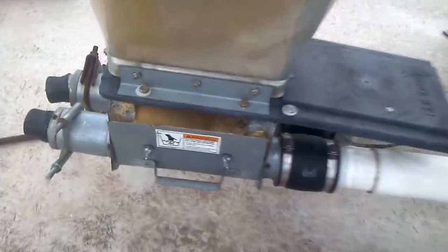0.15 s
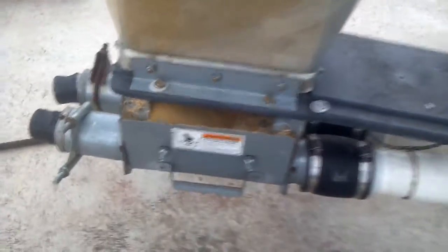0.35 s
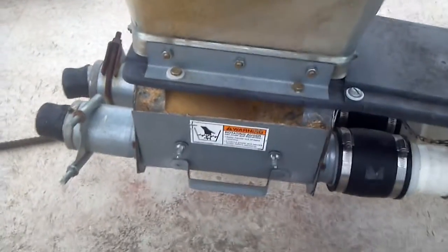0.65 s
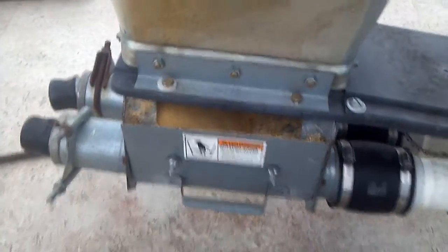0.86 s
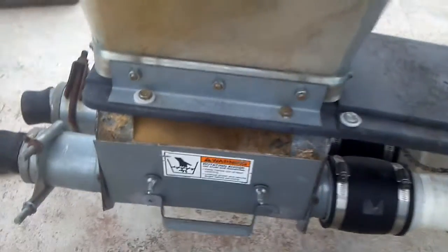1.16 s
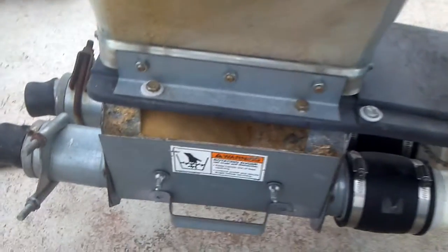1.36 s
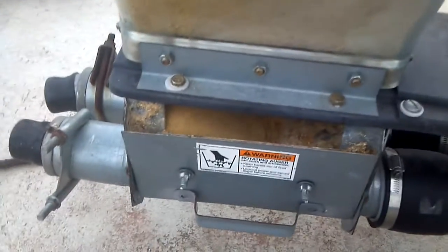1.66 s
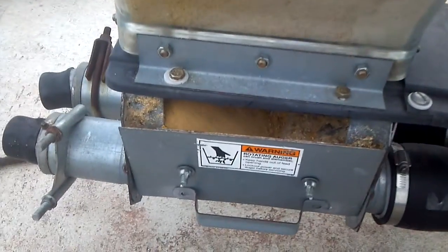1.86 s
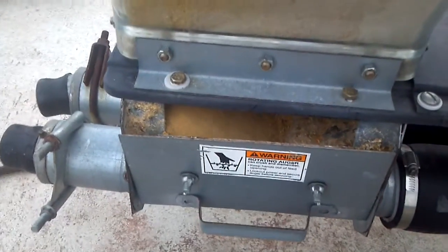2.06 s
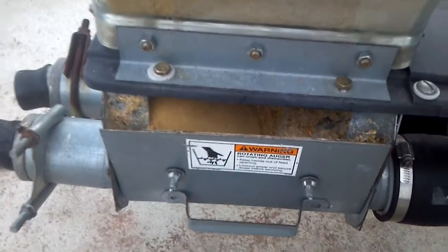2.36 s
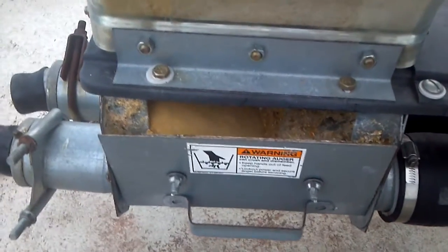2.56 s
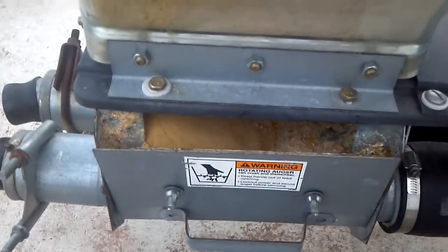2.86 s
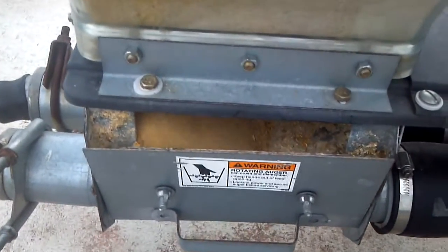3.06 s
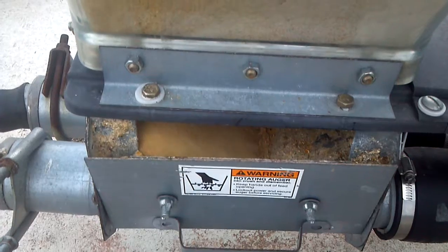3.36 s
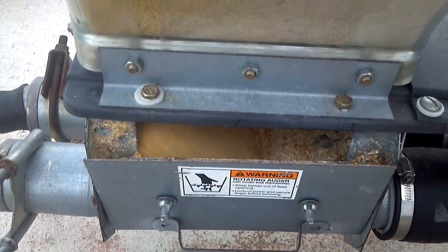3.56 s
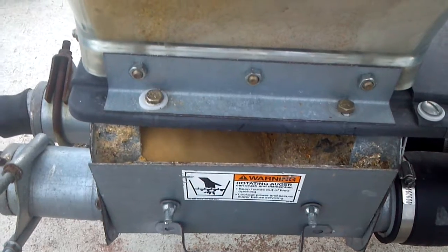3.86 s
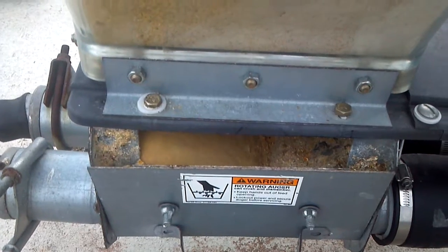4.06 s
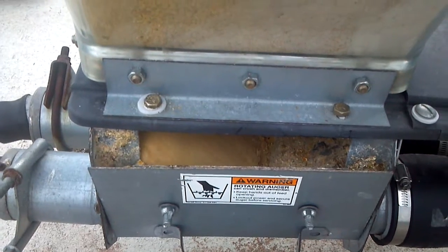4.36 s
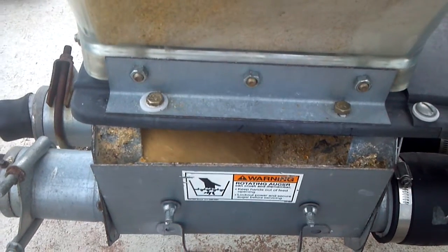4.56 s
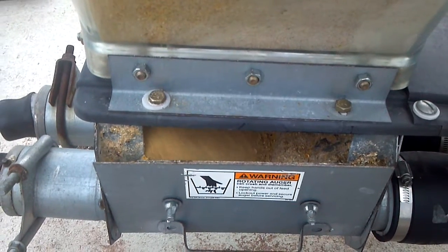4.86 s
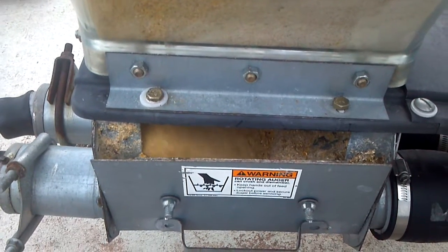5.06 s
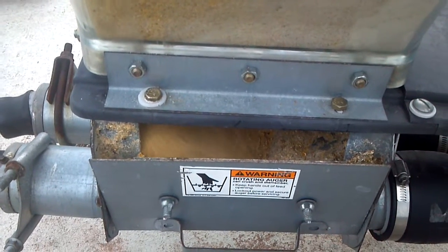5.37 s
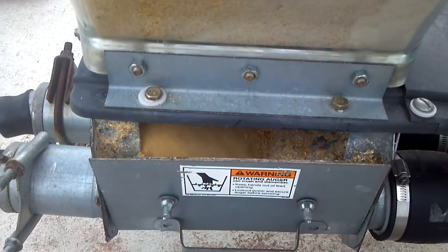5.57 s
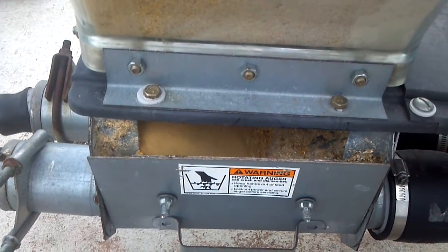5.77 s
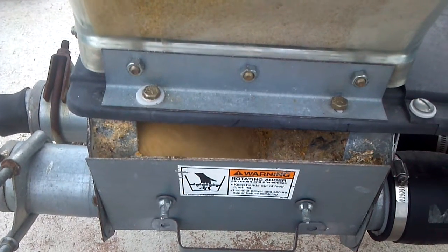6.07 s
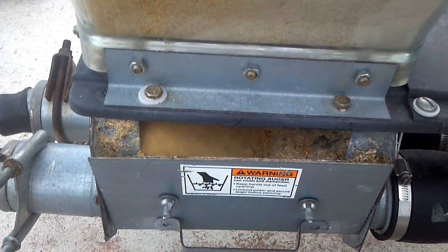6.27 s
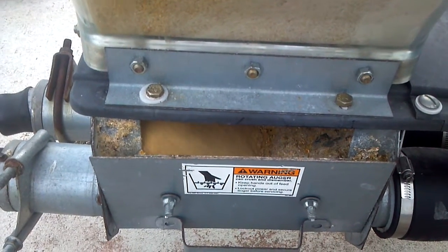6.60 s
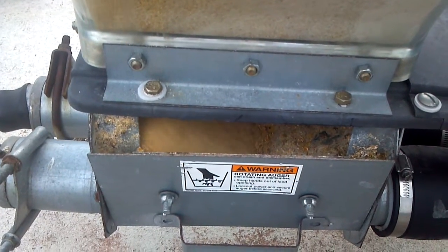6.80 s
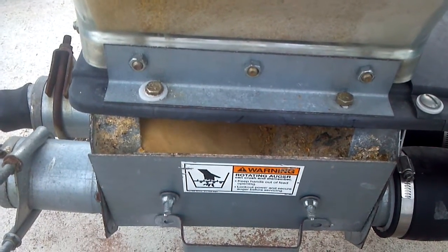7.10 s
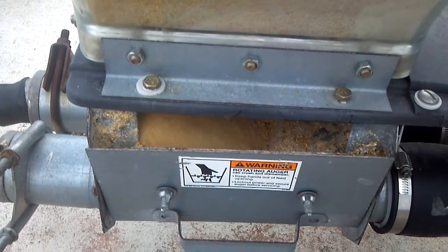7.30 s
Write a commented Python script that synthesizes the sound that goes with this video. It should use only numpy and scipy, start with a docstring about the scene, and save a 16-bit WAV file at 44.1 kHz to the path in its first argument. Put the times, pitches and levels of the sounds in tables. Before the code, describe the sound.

Dry feed hisses and crackles through a steel boot while an auger scrapes round quickly, with hard ticks and low irregular air thumps up close.

```python
"""Feed hisses and crackles through a boot under a hopper, heard close in a farm building.
A flexible auger turns about six times a second: its coil scrapes the tube, which answers with a hollow whirr.
Hard bits tick and rattle on the steel, over the outlet pipe's rattle and the tube's low shudder.
Moving air thumps irregularly, mostly on the left of two microphone ports.
Grains and air are shaped noise; eddies and the ring of the steel are decaying sinusoids."""
import sys
import numpy as np
from scipy import signal
from scipy.fft import rfft, irfft
from scipy.io import wavfile
from scipy.ndimage import uniform_filter1d, minimum_filter1d

SR = 44100
rng = np.random.default_rng(int(sys.argv[2]) if len(sys.argv) > 2 else 0)


def master_out(mix):
    """Clip the mix to full scale and print it as 16-bit PCM to the path in sys.argv[1]."""
    frames = np.transpose(np.atleast_2d(mix))
    ceiling = np.clip(frames, -1, 1)
    pcm = np.round(ceiling * 32767).astype(np.int16)
    wavfile.write(sys.argv[1], SR, pcm)


N = 328104
TIME = np.arange(N) / SR  # s
BINS = np.fft.rfftfreq(N, 1 / SR)  # Hz

# All levels are relative, ahead of the gains in the functions and in record().
# Feed sliding through the boot, which drives hiss, grinding and rasp: [t/s, level/dB]
FEED_FLOW = [(0.0, -27.5), (0.66, -27), (0.98, -27.0), (1.54, -24.5), (1.7, -29), (2.3, -28.5),
             (2.4, -26.5), (2.64, -31.5), (2.8, -29.5), (3.6, -28), (4.3, -28.5), (4.72, -27),
             (5.06, -28.5), (6.32, -28), (6.36, -29.5), (6.72, -31), (6.78, -29), (7.42, -29)]
# Largest spurts of feed on top of the steady flow: [t/s, level/dB]
FEED_SPURTS = [(.132, -26.5), (.508, -27), (.624, -25.5), (1.943, -31), (3.614, -31), (3.685, -34),
               (4.23, -29), (4.99, -34), (5.517, -26.5), (5.804, -34), (6.16, -27.5), (6.235, -29),
               (6.275, -27)]
# Smaller spurts come at random, at a level against the flow
SMALL_SPURTS_PER_S, SMALL_SPURT_DB = 2.3, -1
# Centre pitches of large, middling and fine grains: [f/Hz]
GRAIN_PITCHES = [3300, 7100, 11500]
# Centre pitches of coarse bits ground along the tube: [f/Hz]
COARSE_PITCHES = [750, 1710, 3920]
# Spectrum of grains sliding over steel: [f/Hz, density/dB per Hz]
HISS_SPECTRUM = [(400, -64), (1300, -5.5), (2000, -30.5), (3400, 1), (4100, -3), (4800, -1), (7000, 1),
                 (9200, 1.5), (10700, -1.5), (12500, -6.5), (14000, -9.5), (15600, -12.5)]
# Spectrum of coarse bits along the tube: [f/Hz, density/dB per Hz]
GRINDING_SPECTRUM = [(60, -19), (200, -17), (420, -5), (900, 1), (1250, -4), (1550, 2), (1800, 5),
                     (2100, 7), (3400, -3.5), (4500, -33), (8000, -18.5)]
GRIND_DB = -9.5  # against the hiss

# Rattle of the outlet pipe: [t/s, level/dB]
PIPE_LEVEL = [(0, -39), (1.2, -42.5), (2.2, -52.5), (7.44, -69)]
# Resonances of the outlet pipe: [f/Hz, half-width/Hz, level/dB]
PIPE_RESONANCES = [(600, 250, -3), (1040, 78, 3.5), (1360, 41, 2.5), (1645, 74, 4)]

# Shudder of the tube, shaken by the coil: [f/Hz, density/dB per Hz]
RUMBLE_SPECTRUM = [(30, -28), (65, -11), (90, -1.5), (130, -0.5), (180, -6), (250, -9.5), (350, -13),
                   (480, -18), (700, -26), (2000, -70)]
RUMBLE_DB = -37

# The coil meets the wall once a turn, a little early or late
TURNS_PER_S, FIRST_TURN_S, TURN_JITTER_S = 6.15, 0.1082, 0.0052
# The coil catches on a lump: [t/s, rasp level/dB, level of the tube's ring/dB]
LUMP_CATCHES = [(.105, -24, -36), (.255, -30, -35), (.434, -21, -30), (.761, -29, -38), (.923, -30.5, -51),
                (1.252, -34, -48), (1.418, -39, -26.5), (1.583, -36, -31), (1.905, -33, -43),
                (2.073, -27.5, -33.5), (2.245, -44, -32), (2.395, -38, -43), (3.024, -42, -30),
                (3.516, -25.5, -34), (3.839, -29, -32), (4.331, -30, -30.5), (4.495, -28, -35),
                (4.987, -27.5, -41), (5.311, -29, -50), (5.475, -35, -35), (5.636, -32, -37),
                (5.805, -28.5, -53), (5.975, -40, -30.5), (6.127, -27, -45), (6.947, -28, -36)]
# Resonances of the tube: [f/Hz, half-width/Hz, level/dB]
TUBE_RESONANCES = [(610, 260, -4), (730, 163, -2), (745, 84, -2), (828, 84, 1.5), (1010, 40, -9)]
# Level of the whirr with the microphone's nearness to the boot: [t/s, level/dB]
WHIRR_NEARNESS = [(0, 1), (2.7, 0.4), (4, 2.5), (7.44, 1.7)]
WHIRR_DB, WHIRR_SPREAD_DB = -40, 3
# The rubbing point shifts, so each resonance swells and sinks by itself
MODE_SWAY_DB, MODE_SWAY_HZ = 2.5, 12

# Strength of the draught at the microphone: [t/s, level/dB]
DRAUGHT_LEVEL = [(0.0, -33), (0.2, -42), (0.47, -30), (0.63, -32), (0.79, -45), (1.2, -28.5), (1.42, -39),
                 (1.53, -29), (2.02, -32), (2.2, -35.5), (2.52, -21), (2.62, -28), (2.98, -41), (3.2, -43),
                 (3.48, -48), (3.68, -30.5), (4.05, -39), (4.3, -31.5), (4.55, -36.5), (4.75, -24.5),
                 (5.17, -42), (5.3, -25), (5.5, -32), (5.62, -48), (6.03, -40), (6.14, -26.5), (6.27, -41),
                 (6.4, -48), (6.58, -55), (6.66, -36), (6.82, -40), (6.92, -32), (7.2, -47), (7.44, -37.5)]
# Strongest eddies hitting the microphone: [t/s, level/dB, f/Hz, decay constant/s]
STRONG_EDDIES = [(.4224, -15, 116, 0.008), (.519, -23, 120, 0.0047), (.6258, -11, 185, 0.0033),
                 (.9784, -17, 125, 0.013), (1.121, -15, 111, 0.0047), (1.1968, -19.5, 199, 0.01),
                 (1.2158, -16, 135, 0.0046), (1.281, -19, 143, 0.0053), (1.5052, -10.5, 135, 0.0031),
                 (1.5322, -17, 112, 0.013), (1.5963, -9.5, 138, 0.007), (1.6555, 0, 201, 0.0018),
                 (1.7538, -8.5, 127, 0.0068), (1.907, -22, 100, 0.0046), (2.0165, -8.5, 151, 0.0082),
                 (2.3163, -13, 107, .012), (2.4127, -23, 157, 0.017), (2.4553, -16, 177, .015),
                 (2.4842, -12, 194, .005), (2.5255, -6.5, 115, 0.0055), (2.5574, -6.5, 213, 0.0066),
                 (2.6462, -6.5, 213, 0.003), (2.689, -13.5, 251, 0.0061), (2.6983, -11.5, 182, 0.0067),
                 (2.8577, -10.5, 119, .009), (2.98, -17.5, 184, 0.0063), (3.7073, -13, 221, 0.0022),
                 (4.2771, -16.5, 141, 0.012), (4.331, -18, 124, 0.005), (4.556, -19, 116, 0.0088),
                 (4.6605, -4, 220, 0.00075), (4.6806, -12.5, 168, .009), (4.7401, -16, 159, .012),
                 (4.764, -9, 170, 0.0029), (4.7843, -6, 148, 0.012), (4.8355, -10, 135, 0.0037),
                 (4.871, -15, 155, .005), (4.921, -23, 113, .007), (5.0284, -16, 115, .012),
                 (5.0628, -14.5, 114, .012), (5.1727, -17, 147, 0.0039), (5.2476, -14.5, 134, 0.011),
                 (5.2717, -8.5, 142, 0.0052), (5.2917, -5.5, 173, 0.0046), (5.4421, -13.5, 110, 0.026),
                 (5.4894, -12.5, 106, 0.0055), (6.1101, -21, 149, 0.0047), (6.1372, -20.5, 103, 0.0073),
                 (6.2455, -13.5, 98, 0.0081), (6.672, -29, 113, .007), (6.731, -21, 113, 0.0055),
                 (6.872, -20, 129, 0.0084), (6.91, -15, 119, 0.0071), (6.957, -23, 100, .01),
                 (7.101, -19, 100, .008)]
# Spectrum of the turbulent air: [f/Hz, density/dB per Hz]
BUFFET_SPECTRUM = [(20, -39), (45, -17), (65, -9.5), (90, -0.5), (120, 0), (165, -3), (220, -8.5),
                   (320, -19.5), (450, -27), (900, -101), (2000, -82)]
# The draught swells and sinks by at most this much, up to about this often a second
LUMP_RANGE_DB, LUMP_HZ = 6, 22.3
# Smaller eddies come at random, at a level against the draught
SMALL_EDDIES_PER_S, SMALL_EDDY_DB, SMALL_EDDY_HZ, SMALL_EDDY_FALL_S = 6.8, 2, 175, 0.009

# Hardest bits striking the steel: [t/s, level/dB, bright against dull/dB, rattling share/0-1]
HARD_TICKS = [(0.084, -20, 7, .02), (.129, -17, 11, .2), (0.2476, -16, 10, 0), (.4325, -23, 7, 0.7),
              (0.8477, -17.5, 4, 0.7), (0.914, -15, 4, 0.7), (0.92, -22, 6, .6), (1.018, -17, 17, .2),
              (1.478, -24, 8, .3), (1.497, -16, 14, .2), (1.706, -14.5, 16, 0.5), (1.9426, -17, 15, 0.2),
              (2.2015, -15, 16, 0), (2.2897, -19, 0, 0.15), (2.3512, -17.5, 9, 0.3),
              (2.4867, -12.5, -1, 0.03), (2.7786, -20, 2, 0.3), (3.066, -20, 10, .1), (3.1926, -24, 8, .1),
              (3.211, -19, 9, 0.5), (3.6085, -16.5, 7, 0.7), (3.673, -16.5, 11, .5),
              (3.8408, -12.5, 4, 0.4), (3.9027, -18, -10, 0.4), (4.152, -16.5, 5, .7), (4.548, -23, 8, .1),
              (4.637, -17.5, 6, 0.7), (4.803, -18, 8, .5), (4.8963, -10, -1.5, 0.04), (5.5493, -20, 6, .6),
              (5.7136, -18, 4, 0.2), (5.941, -21, 5, 0), (5.982, -20.5, 6, 0.5), (6.0172, -14, 20, 0.4),
              (6.3147, -11, -10, 0.4), (6.347, -18.5, 0, .1), (6.77, -20.5, 9, 0), (6.799, -16, 4, 0.1),
              (6.805, -26, 10, .1), (6.8285, -21, 10, 0.1), (6.9327, -15, 2, 0.02), (7, -24, 10, 0),
              (7.105, -15.5, 10, 0.3), (7.1116, -18.5, 9, 0), (7.205, -16.5, 16, 0), (7.247, -17.5, 14, .7)]
# Dull part of a tick: [f/Hz, density/dB per Hz]
DULL_SPECTRUM = [(500, -24), (1300, -14), (2200, -3), (3000, 3), (4100, -2), (4700, 9), (5400, 5.5),
                 (6800, 2), (8200, 3), (10000, -1.5), (12000, -8), (16000, -17)]
# Bright part of a tick: [f/Hz, density/dB per Hz]
BRIGHT_SPECTRUM = [(1000, -13.5), (4500, -9), (7000, -4.5), (9700, -4.5), (12000, -9.5), (16000, -16)]
# Lighter bits strike at random, at a level against the flow
SMALL_TICKS_PER_S, SMALL_TICK_DB, SMALL_TICK_SPREAD_DB = 13, 3.6, 2.2
SMALL_TICK_BRIGHT_DB, SMALL_TICK_RATTLE = 6, .2
SNAP_S, RATTLE_S = .0008, .0045  # decay constants: snap in amplitude, rattle in power
# Ring of the boot under heavy bits: [f/Hz, level/dB, t60/s]
STEEL_MODES = [(3400, -4, 0.026), (4770, -3, 0.019), (9670, -7.5, .045)]

# Spectrum of the coil's scrape: [f/Hz, density/dB per Hz]
RASP_SPECTRUM = [(400, -26), (900, 11), (1400, 1), (1900, 13), (3500, 8), (6000, 6), (10000, -0.5),
                 (16000, -36)]
RASP_DB, RASP_SPREAD_DB = -3.5, 1.5  # against the flow

# Shaded right port against the left, for sound from the boot: [f/Hz, level/dB]
PORT_SHADE = [(500, 0), (2000, -2), (3500, -5), (4300, -4), (7000, -7.5), (10000, -7), (15000, -4.5)]
# Colour of the left channel against the right: [f/Hz, level/dB]
CHANNEL_BALANCE = [(250, -3.4), (500, -4.5), (800, -6), (1380, -2), (2000, -2.5), (2750, 0), (3400, -3),
                   (4150, -.5), (5500, -1), (6300, -2.5), (8300, -2.8), (11000, -1.5), (13800, -.3)]
PORT_LAG = 16  # samples
EDGE_HZ = 15800


def gain_of(db):
    """Decibels to amplitude."""
    return 10 ** (np.asarray(db) / 20)


def evened(x):
    """Scales to an rms of one."""
    return x / np.sqrt(np.mean(x ** 2) + 1e-20)


def level_at(rows, s):
    """Level in dB of a (t/s, level/dB) curve at the times s."""
    return np.interp(s, *np.transpose(rows))


def curve(rows):
    """Gain over time from (t/s, level/dB) rows."""
    return gain_of(level_at(rows, TIME))


def spectrum(points):
    """Gain over frequency from (f/Hz, level/dB) points, joined on a logarithmic pitch scale."""
    hz, db = np.transpose(points)
    return gain_of(np.interp(np.log(BINS + 1), np.log(hz), db))


def shaped(x, gains):
    """Filters x by a gain for each frequency."""
    return irfft(rfft(x) * gains, N)


def wander(hz):
    """Smooth chance of rms one, moving up to about hz times a second."""
    return evened(shaped(rng.standard_normal(N), np.exp(-(BINS / hz) ** 2)))


def moments(per_s):
    """Random times, per_s a second on average, each with two normal chance values."""
    chance, values = rng.random(N), rng.standard_normal((2, N))
    hit = chance < per_s / SR
    return TIME[hit], *values[:, hit]


def swell(s, rise, fall):
    """A bump of height one around s: its samples, their times from s, its shape."""
    first = max(0, int((s - 8 * rise) * SR))
    last = min(N, int((s + 8 * fall) * SR))
    span = np.arange(first, last)
    t = span / SR - s
    shape = 1 / (np.exp(-t / rise) + np.exp(t / fall))
    return span, t, shape / shape.max()


def swells(times, dbs, rise, fall):
    """Power envelope of a row of bumps."""
    power = np.zeros(N)
    for s, db in zip(times, dbs):
        span, _, shape = swell(s, rise, fall)
        power[span] += (gain_of(db) * shape) ** 2
    return power


def linger(power, seconds):
    """Spreads power into an exponential tail."""
    r = np.exp(-1 / (seconds * SR))
    return signal.lfilter([1 - r], [1, -r], power)


def crackle(per_s, spread_db, ring, smooth):
    """Mean-one power of tiny impacts over a smooth share; a few are large, or weak if spread_db < 0."""
    sizes = gain_of(spread_db * np.minimum(rng.exponential(1, N), 4)) ** 2
    struck = rng.random(N) < per_s / SR
    power = linger(sizes * struck, ring)
    smooth = np.clip(smooth, 0, 1)
    return smooth + (1 - smooth) * power / power.mean()


def portions(pitches, width):
    """Each size of grain takes the part of the spectrum around its own pitch."""
    bands = [np.exp(-(np.log((BINS + 100) / hz) / width) ** 2) for hz in pitches]
    shares = np.array(bands) + 1e-30
    return np.sqrt(shares / shares.sum(0))


def resonances(rows):
    """Gain over frequency of each (f, half-width, level) resonance; their summed mean power is one."""
    peaks = [gain_of(db) / (1 + ((BINS - hz) / width) ** 2) for hz, width, db in rows]
    return evened(np.array(peaks)) / np.sqrt(len(rows))


def scatter(power, gains):
    """Noise from all over the boot: unrelated at the two ports, weaker at the shaded one."""
    shade = spectrum(PORT_SHADE)
    ports = np.array([np.ones_like(shade), shade]) / np.sqrt(1 + shade ** 2)
    return shaped(rng.standard_normal((2, N)) * np.sqrt(power), ports * gains)


def feed():
    """Grains of three sizes slide over steel, now and then in a spurt; coarse ones grind along the tube."""
    surge = gain_of(.6 * wander(hz=40))
    steady = (surge * curve(FEED_FLOW)) ** 2
    s, chance_db, _ = moments(SMALL_SPURTS_PER_S)
    small = np.transpose([s, level_at(FEED_FLOW, s) + SMALL_SPURT_DB + chance_db])
    spurts = np.vstack([FEED_SPURTS, small])
    flow = steady + swells(*spurts.T, rise=0.026, fall=0.022)
    clumps = crackle(per_s=300, spread_db=3.2, ring=.001, smooth=.74)
    hiss, grind = np.zeros((2, 2, N))
    for part in portions(GRAIN_PITCHES, width=0.41):
        grains = crackle(per_s=900, spread_db=1.5, ring=0.0012, smooth=0.72)
        hiss += scatter(grains * clumps * flow, part * evened(spectrum(HISS_SPECTRUM)))
    for part in portions(COARSE_PITCHES, width=0.38):
        coarse = crackle(per_s=260, spread_db=3.2, ring=.0035, smooth=.4)
        grind += scatter(coarse * steady, part * evened(spectrum(GRINDING_SPECTRUM)))
    return hiss + gain_of(GRIND_DB) * grind


def pipe():
    """A throaty rattle along the outlet pipe falls away as the microphone closes in on the boot."""
    grains = crackle(per_s=140, spread_db=-2.0, ring=0.0023, smooth=0.63)
    colour = evened(resonances(PIPE_RESONANCES).sum(0))
    return scatter(grains * curve(PIPE_LEVEL) ** 2, colour)


def rumble():
    """The turning coil shakes the tube; its low, uneven shudder reaches both ports alike."""
    shudder = evened(shaped(rng.standard_normal(N), spectrum(RUMBLE_SPECTRUM)))
    return gain_of(RUMBLE_DB + 1.9 * wander(hz=23)) * shudder


def turns():
    """Times at which the coil meets the tube wall."""
    s = np.arange(FIRST_TURN_S, N / SR + 1 / TURNS_PER_S, 1 / TURNS_PER_S)
    s = s + TURN_JITTER_S * rng.standard_normal(len(s))
    return s[s < N / SR]


def whirr(turn_s):
    """Uneven rubbing and each scrape ring the tube; one hollow tone reaches both ports, weaker at the right."""
    whirr_db = WHIRR_DB + WHIRR_SPREAD_DB * rng.standard_normal(len(turn_s))
    rubbing = gain_of(-41) ** 2
    catch_s, _, ring_db = np.transpose(LUMP_CATCHES)
    power = rubbing + swells(turn_s, whirr_db, rise=0.037, fall=0.076)
    power += swells(catch_s, ring_db, rise=0.0055, fall=0.02)
    force = curve(WHIRR_NEARNESS) * gain_of(1.1 * wander(hz=31.2)) * np.sqrt(power)
    tone = np.zeros(N)
    for mode in resonances(TUBE_RESONANCES):
        sway = gain_of(MODE_SWAY_DB * wander(MODE_SWAY_HZ))
        tone += shaped(force * sway * rng.standard_normal(N), mode)
    return gain_of(-5.0) * np.array([tone, gain_of(-4.0) * tone])


def eddy(s, db, hz, fall):
    """A brief swing of pressure; a stronger eddy adds a stronger, quicker flutter at its centre."""
    span, t, shape = swell(s, rise=.0019, fall=fall)
    swing = shape * np.cos(2 * np.pi * hz * t)
    flutter = .72 * np.sqrt(gain_of(db)) * np.exp(-abs(t) / .0016) * np.sin(2 * np.pi * 365 * t)
    return span, -gain_of(db) * (swing + flutter)


def draught():
    """Lumpy turbulence presses on both ports, mostly the left, and single eddies on the left alone."""
    lumps = curve(DRAUGHT_LEVEL) * gain_of(LUMP_RANGE_DB * np.tanh(1.03 * wander(hz=LUMP_HZ)))
    air = lumps * evened(shaped(rng.standard_normal((2, N)), spectrum(BUFFET_SPECTRUM)))
    s, size_db, speed = moments(SMALL_EDDIES_PER_S)
    small_db = level_at(DRAUGHT_LEVEL, s) + SMALL_EDDY_DB + size_db
    small_hz = SMALL_EDDY_HZ * np.exp(0.32 * speed)
    small = np.transpose([s, small_db, small_hz, np.full(len(s), SMALL_EDDY_FALL_S)])
    eddies = np.zeros(N)
    for row in np.vstack([STRONG_EDDIES, small]):
        span, pressure = eddy(*row)
        eddies[span] += pressure
    # the port weakens the slowest pressure changes and the treble of the eddies
    passband = 1 / np.sqrt((1 + (75 / (BINS + 1)) ** 6) * (1 + (BINS / 720) ** 6))
    left = gain_of(3.5) * air[0] + gain_of(0.85) * shaped(eddies, passband)
    # the strongest blows overload the microphone softly
    ceiling = .68
    return np.array([ceiling * np.tanh(left / ceiling), gain_of(-4.5) * air[1]])


def ticks():
    """A hard bit snaps against the steel and may rattle briefly in the boot."""
    s, size, hardness = moments(SMALL_TICKS_PER_S)
    small_db = level_at(FEED_FLOW, s) + SMALL_TICK_DB + SMALL_TICK_SPREAD_DB * size
    small_bright_db = SMALL_TICK_BRIGHT_DB + 3 * hardness
    small = np.transpose([s, small_db, small_bright_db, np.full(len(s), SMALL_TICK_RATTLE)])
    s, db, bright_db, rattle = np.vstack([HARD_TICKS, small]).T
    bright = 1 / (1 + gain_of(-bright_db) ** 2)  # share of the power
    out = np.zeros((2, N))
    for part, colour in ((1 - bright, DULL_SPECTRUM), (bright, BRIGHT_SPECTRUM)):
        loose_part = part * np.clip(rattle, 0, 1)
        snap = swells(s, db + 10 * np.log10(part + 1e-9), rise=.00012, fall=SNAP_S)
        loose = swells(s, db + 10 * np.log10(loose_part + 1e-9), rise=.00012, fall=SNAP_S)
        out += scatter(snap + linger(loose, RATTLE_S), evened(spectrum(colour)))
    return gain_of(2.4) * out


def steel():
    """A heavy, dull bit that rattles on leaves a short ring in the boot, pitched by where it lands."""
    ring = np.zeros(N)
    places = rng.standard_normal(len(HARD_TICKS))
    for (s, db, bright_db, rattle), place in zip(HARD_TICKS, places):
        span, t, _ = swell(s, rise=.00012, fall=.005)
        t = np.maximum(t, 0)
        weight = gain_of(db) * np.sqrt(np.clip(rattle, 0, 1) / (1 + gain_of(bright_db) ** 2))
        for hz, level, t60 in STEEL_MODES:
            tone = np.sin(2 * np.pi * hz * (1 + 0.0096 * place) * t)
            ring[span] += weight * gain_of(level - 60 * t / t60) * tone
    return np.array([ring, shaped(ring, spectrum(PORT_SHADE))])


def scrapes(turn_s):
    """Each turn the coil drags feed over the wall in a short gritty rasp; a lump adds a shorter one."""
    chance_db = RASP_SPREAD_DB * rng.standard_normal(len(turn_s))
    rasp_db = level_at(FEED_FLOW, turn_s) + RASP_DB + chance_db
    catch_s, catch_db, _ = np.transpose(LUMP_CATCHES)
    power = swells(turn_s, rasp_db, rise=0.0069, fall=0.016)
    power += swells(catch_s, catch_db, rise=0.0061, fall=0.0091)
    grit = crackle(per_s=700, spread_db=3.3, ring=.001, smooth=.45)
    return scatter(grit * power, evened(spectrum(RASP_SPECTRUM)))


def scene():
    """Pressure at the two microphone ports."""
    turn_s = turns()
    sliding = feed() + pipe()
    turning = rumble() + whirr(turn_s) + scrapes(turn_s)
    return sliding + turning + draught() + ticks() + steel()


def limited(x):
    """A quick limiter turns both channels down for a few milliseconds around peaks above 0.9."""
    gain = np.minimum(1, .9 / (abs(x).max(0) + 1e-9))
    return x * uniform_filter1d(minimum_filter1d(gain, size=161), size=81)


def record(dry):
    """Stereo widening takes the delayed opposite port from each; then channel colour, limiter, band limit."""
    opposite = np.pad(dry[::-1], ((0, 0), (PORT_LAG, 0)))[:, :N]
    wide = dry - opposite
    lean = spectrum(CHANNEL_BALANCE)
    colour = np.array([lean, np.ones_like(lean)]) * np.sqrt(2 / (1 + lean ** 2))
    coloured = shaped(wide, colour)
    low_pass = signal.firwin(1023, EDGE_HZ, window=("kaiser", 9), fs=SR)
    return signal.oaconvolve(limited(coloured), low_pass[None], "same")


dry = scene()
out = record(dry)
master_out(out)
```